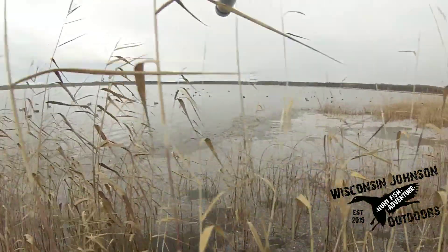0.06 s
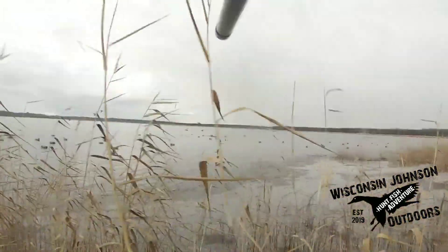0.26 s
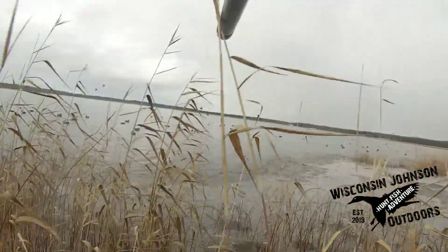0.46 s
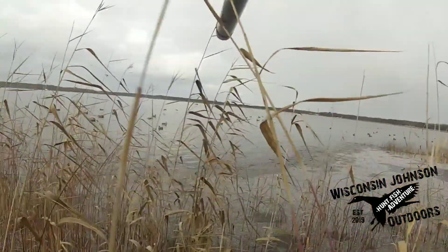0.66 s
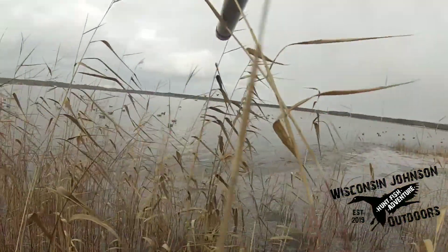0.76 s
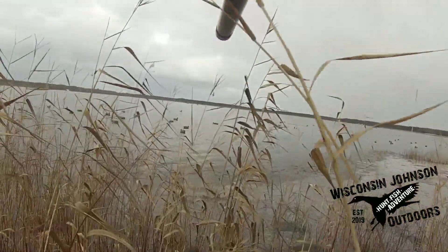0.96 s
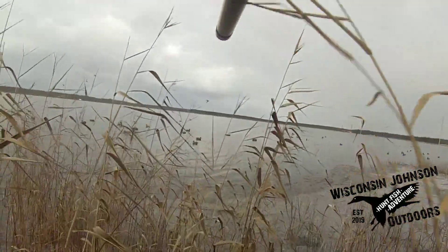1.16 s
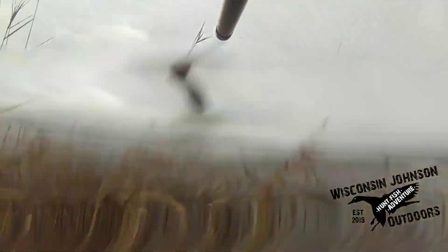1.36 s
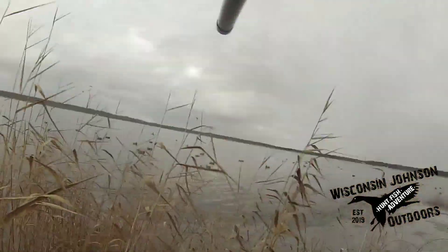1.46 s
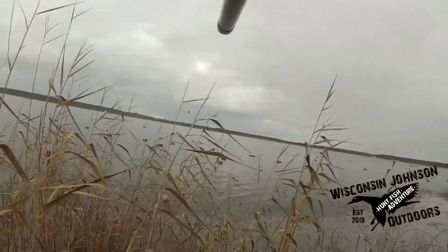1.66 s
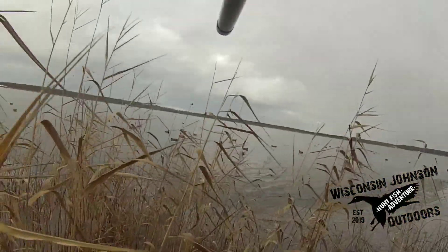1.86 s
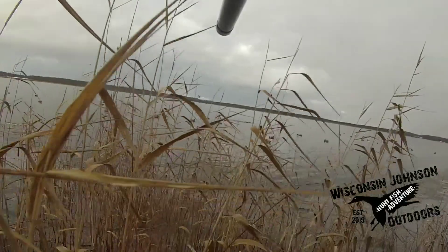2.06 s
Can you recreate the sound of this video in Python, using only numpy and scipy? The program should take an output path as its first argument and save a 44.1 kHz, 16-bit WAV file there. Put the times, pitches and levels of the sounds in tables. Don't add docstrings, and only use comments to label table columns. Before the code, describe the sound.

A metal action slams open at 0.2 s and rattles shut around 0.37-0.41, overloading the close microphone. Hard single knocks follow at 0.59 and 0.71. Bright ticks and dry stem scrapes cluster from 0.8 to 1.25 over dull grip rumble. A heavy crack at 1.4 leads into opening at 1.44 and closing around 1.62-1.66; the hollow tube ring swells briefly, then fades to faint hiss.

```python
import sys
import numpy as np
from scipy import signal
from scipy.fft import rfft, irfft, next_fast_len
from scipy.io import wavfile
from scipy.ndimage import map_coordinates

SR = 44100
rng = np.random.default_rng(int(sys.argv[2]) if len(sys.argv) > 2 else 0)


def output_pcm(signal):
    pcm = np.clip(np.atleast_2d(signal).T, -1, 1) * 32767
    wavfile.write(sys.argv[1], SR, np.round(pcm).astype(np.int16))


def elevation(decibels):
    levels = np.asarray(decibels, float)
    return 10 ** (levels / 20)


N = 92610


def unit(x):
    return x / np.sqrt(np.mean(x ** 2) + 1e-20)


def filtered(x, response):
    m = next_fast_len(N + SR // 2)
    return irfft(rfft(x, m) * response(np.fft.rfftfreq(m, 1 / SR)), m)[:N]


def coloured(points, x=None):
    f, v = np.transpose(points)
    x = rng.standard_normal(N) if x is None else x
    return unit(filtered(x, lambda hz: elevation(np.interp(np.log(hz + 1), np.log(f + 1), v, -120, -120))))


def curve(rows):
    return np.interp(np.arange(N) / SR, *np.transpose(rows))


def wobble(rate):
    knots = rng.standard_normal(int(N * rate / SR) + 4)
    return map_coordinates(knots, [np.arange(N) * rate / SR])


def grains(per_s, spike_db):
    u = rng.random((3, N))
    return (u[0] < per_s / SR) * np.sign(u[1] - .5) * elevation(-spike_db * np.log(u[2] + 0.13))


def since(s):
    return np.maximum(np.arange(N) / SR - s, 0)


def sine(hz, t, phase=0):
    return np.sin(2 * np.pi * hz * t + phase)


def strike(s, t60, attack_s, hold_s=0):
    out, first = np.zeros(N), int(s * SR) + 1
    t = np.arange(first, min(N, first + int((hold_s + 2 * t60) * SR))) / SR - s
    release = elevation(-60 * np.maximum(t - hold_s, 0) / t60)
    out[first:first + len(t)] = release * (1 - np.exp(-t / attack_s))
    return out


def stroke(rows):
    out = np.zeros(N)
    for s, length, db, fall_db in rows:
        stop_db = 60 * since(s + length) / 0.012
        out += elevation(db - fall_db * since(s) / length - stop_db) * (since(s) > 0)
    return out


def rung(s, hz, db, t60, attack_s, blur):
    out, level = np.zeros(N), strike(s, t60, attack_s)
    on = np.flatnonzero(level)
    out[on] = elevation(db) * level[on] * sine(hz, on / SR - s, blur[on])
    return out


FLOOR_DB = -72.5


def hiss():
    return elevation(FLOOR_DB) * coloured([(1000, 3.5), (4000, -3.5), (15500, -6.5)])


# [t/s, level/dB]
GRIP = [(0, -34.5), (.12, -40.5), (.4, -43.5), (.46, -50), (.58, -45.5), (.64, -40), (.7, -41.5),
        (.85, -34.5), (1, -41.5), (1.2, -48.5), (1.38, -49.5), (1.57, -36), (1.7, -46), (2.1, -51.5)]
# [f/Hz, level/dB]
HOUSING_SPECTRUM = [(20, -18.5), (90, -15.5), (250, -6.5), (550, -4), (750, -2), (1050, -10.5), (1400, -31),
                    (2000, -64.5)]


def grip():
    rumble = coloured(HOUSING_SPECTRUM) + 0.62 * coloured(HOUSING_SPECTRUM, grains(300, 2.9))
    return elevation(curve(GRIP) - 5.0 + 1.3 * wobble(30)) * rumble


# [t/s, level/dB]
STEM_CONTACT = [(0, -47), (.18, -59), (.36, -51.5), (.43, -54.5), (.57, -79), (.62, -55.5), (.74, -49),
                (.98, -48.5), (1.035, -64.5), (1.13, -47), (1.2, -70), (1.25, -60), (1.36, -73.5),
                (1.5, -54.5), (1.6, -52), (1.7, -58.5), (2.1, -86.5)]
# [f/Hz, level/dB]
STEM_SPECTRUM = [(710, -41), (1200, -2.5), (4040, -5.5), (7020, -12.5), (8260, -14.5), (14800, -25.5),
                 (16000, -38)]
SCRAPE_LUMPS_DB = 2.5


def reeds():
    scrape = coloured(STEM_SPECTRUM) + .7 * coloured(STEM_SPECTRUM, grains(1000, 6.2))
    return elevation(curve(STEM_CONTACT) + SCRAPE_LUMPS_DB * wobble(50.32)) * scrape


# [t/s, f/Hz, level/dB, t60/s]
HOUSING_KNOCKS = [(.03, 717, -24, 0.031), (.08, 603, -29, 0.048), (.2, 463.6, -10, .05),
                  (.252, 748, -20.5, 0.054), (.322, 700, -23.5, 0.046), (.6935, 583, -24, 0.058),
                  (.7075, 630, -1, 0.037), (.7115, 317, -13, 0.053), (.716, 764, -20.5, 0.043),
                  (.7947, 583, -35, .05), (.811, 582, -27.5, 0.058), (.8346, 571, -27.5, 0.079),
                  (.844, 610, -25.5, 0.028), (.9059, 537, -27.5, 0.065), (1.1274, 748, -28, 0.058),
                  (1.154, 722, -22.5, 0.05), (1.566, 734, -28, 0.073)]
KNOCK_BLUR_RAD = .8


def knocks():
    blur = KNOCK_BLUR_RAD * wobble(200)
    return sum(rung(*row, 0.00066, blur) for row in HOUSING_KNOCKS)


# [t/s, peak/dB, t60/s, level above 5 kHz/dB]
LIGHT_TICKS = [(0.0279, -23, 0.047, -4), (0.053, -36, 0.028, 2), (0.173, -37, .02, -19),
               (0.251, -35, 0.0089, -1), (.262, -34, .02, -12), (0.7013, -21, 0.023, -17),
               (0.813, -30, 0.039, -13), (.8346, -33, 0.029, -13), (.881, -34, .015, -4),
               (.896, -29, 0.026, -4), (0.9062, -25.5, 0.018, -5), (1.0562, -33, 0.013, -5),
               (1.0701, -25, 0.015, 0), (1.107, -26, 0.018, 7.5), (1.134, -37, 0.01, 3),
               (1.494, -30, 0.009, -3), (1.5427, -42, 0.017, -14), (1.565, -35, .02, -18),
               (1.616, -32, 0.013, 1), (1.7607, -45, .02, 0), (0.317, -28, 0.025, -26),
               (0.796, -30, 0.025, -23), (0.861, -25.5, 0.025, -25), (0.9383, -7, 0.026, 3.5),
               (0.9695, -14, 0.049, -0.5), (1.0174, -26, 0.012, 0), (1.0841, -21.5, 0.039, -0.5),
               (1.127, -18.5, 0.016, 4), (1.156, -11.5, 0.037, 2.5), (1.1532, -14.5, 0.039, 3.5),
               (1.2249, -11.5, 0.016, -21), (1.4894, -27, 0.01, -1), (1.5042, -19, 0.0069, 0.5),
               (1.524, -27.5, 0.021, -18), (1.797, -43, 0.031, 2.5), (1.955, -45, 0.018, 1),
               (2.0284, -50.5, 0.03, 4)]
# [f/Hz, level/dB]
TICK_SPECTRUM = [(710, -45.5), (1200, -7.5), (2180, -14.5), (3790, 0.5), (5300, -6), (6440, -4), (8170, -9),
                 (14700, -16.5), (16000, -32.5)]
TICK_HOUSING_DB = -16.5


def ticks():
    noise = coloured(TICK_SPECTRUM)
    low = filtered(noise, lambda hz: 1 / (1 + (hz / 5000) ** 8))
    high = noise - low
    out, thud = np.zeros(N), np.zeros(N)
    for s, db, t60, high_db in LIGHT_TICKS:
        out += elevation(db - 6.5) * strike(s, t60, 0.000081) * (low + elevation(high_db) * high)
        thud += elevation(db + TICK_HOUSING_DB) * strike(s, 0.067, 0.0085)
    return out + thud * coloured(HOUSING_SPECTRUM)


# [t/s, f/Hz, level/dB, t60/s]
PART_NOTES = [(.2805, 3050, -32, .024), (.3676, 2120, -15, .021), (.3752, 2920, -19, .021),
              (.3858, 1950, -13, .021), (.3983, 2820, -5, .024), (.5886, 3320, -9, .024),
              (.7066, 3450, -9, .024), (.9395, 3500, -16, .03), (.9545, 3850, -36, .035),
              (.9725, 6250, -26, .028), (1.085, 3900, -30, .045), (1.1545, 3600, -19, .04),
              (1.1565, 6500, -30, .085), (1.172, 5650, -49, .13), (1.2255, 3900, -24, .028),
              (1.2275, 2650, -49, .22), (1.2272, 3270, -45, .12), (1.6555, 2380, -9, .024),
              (1.666, 13050, -48, .11)]
PART_BLUR_RAD = .55


def small_parts():
    blur = PART_BLUR_RAD * wobble(150)
    return sum(rung(*row, 0.00027, blur) for row in PART_NOTES)


# [t/s, length/s, level/dB, fall/dB]
BRIGHT_DRAGS = [
    (.2244, 0.023, -21, 24.5),
    (1.441, 0.022, -19, 8.5),
    (1.465, 0.019, -25.5, 16),
    (.596, 0.14, -46, 15.5),
    (.715, 0.076, -32, 30),
    (1.054, 0.0925, -43.5, -5),
]
DRAG_LUMPS_DB, DRAG_SPIKE_DB = 3, 4


def drags():
    crackle = coloured(TICK_SPECTRUM, grains(3000, DRAG_SPIKE_DB))
    return stroke(BRIGHT_DRAGS) * elevation(DRAG_LUMPS_DB * wobble(100)) * crackle


# [t/s, level/dB]
LOOSENESS = [(.2, -93.5), (.26, -50.5), (.36, -49), (.43, -44.5), (.5, -67), (.585, -60.5), (.6, -92),
             (1.45, -93.5), (1.51, -48), (1.62, -45), (1.7, -53.5), (1.85, -63), (2.1, -76.5)]
# [f/Hz, level/dB]
BUZZ_SPECTRUM = [(1400, -14.5), (1950, 1.5), (2250, 3), (2600, -9.5), (3100, 1.5), (3900, -12.5),
                 (5400, -16), (8000, -30)]


def buzz():
    chatter = coloured(BUZZ_SPECTRUM) + 0.48 * coloured(BUZZ_SPECTRUM, grains(560, 3))
    return elevation(curve(LOOSENESS) + 3 * wobble(70)) * chatter


# [t/s, level/dB]
SPRING_HUMS = [
    (0.242, -47.5),
    (.44, -57),
    (1.479, -51),
]
SPRING_S, SPRING_FROM_HZ, SPRING_TO_HZ = .13, 85, 102


def springs():
    out = np.zeros(N)
    for s, db in SPRING_HUMS:
        u = np.clip(since(s) / SPRING_S, 0, 1)
        hz = SPRING_FROM_HZ + (SPRING_TO_HZ - SPRING_FROM_HZ) * u ** .5
        out += elevation(db) * np.abs(np.sin(np.pi * u)) ** .5 * np.sin(2 * np.pi * np.cumsum(hz) / SR)
    return out


REGRIP_S, REGRIP_T60_S, REGRIP_DB, REGRIP_HZ = 1.86, 0.29, -51.5, 586


def regrip():
    level = elevation(REGRIP_DB + 1.62 * wobble(20)) * strike(REGRIP_S, 1.6, 0.034)
    return level * sine(REGRIP_HZ, since(REGRIP_S), 0.29 * wobble(80))


# [t/s, level/dB, unsteadiness/rad, sway share/0-1, main mode extra/dB]
TUBE_RINGS = [
    (.25, -23.5, 0.77, 0.02, -4.7),
    (.41, -25, 0.24, 0.42, -2),
    (1.5, -27, 1.15, 0.16, 2),
    (1.665, -29.5, 0.38, 0.93, 1.5),
]
TUBE_DAMPED_S = [
    .37,
    .588,
    1.625,
    3,
]
# [f/Hz, level/dB, t60/s]
TUBE_MODES = [(367, -13.5, 0.56), (604, -16.5, 2.8), (702, 1, 0.95), (802, 0, 0.74), (992, -5, 0.96),
              (1740, -28, 1), (1930, -14.5, 0.42), (2350, -24.5, 0.58)]
MAIN_MODE = 2
SWAY_HZ, SWAY_DB, SWAY_T60_S = 35.3, -1, 1.6
GAIN_BACK_S = 0.063
TUBE_FLUTTER_DB, TUBE_BLUR_PER_S, BLUR_GROWS = 2, 120, 1.5


def tube():
    choke_db = 60 * since(REGRIP_S) / REGRIP_T60_S
    out = np.zeros(N)
    for (s, db, unsteady, sways, main_db), end in zip(TUBE_RINGS, TUBE_DAMPED_S):
        t = since(s)
        ring = np.zeros(N)
        for k, (hz, mode_db, t60) in enumerate(TUBE_MODES):
            level_db = mode_db - 60 * t / t60 + TUBE_FLUTTER_DB * wobble(11.88)
            if k == MAIN_MODE:
                level_db = level_db + main_db - choke_db
            blur = unsteady * (hz / 700) ** BLUR_GROWS * wobble(TUBE_BLUR_PER_S)
            ring += elevation(level_db) * sine(hz, t, blur)
        sway = sways * elevation(SWAY_DB - 60 * t / SWAY_T60_S) * sine(SWAY_HZ, t)
        gain = (1 - np.exp(-t / GAIN_BACK_S)) ** 2
        out += elevation(db - 60 * since(end) / 0.023) * gain * (ring + sway)
    return out


# [t/s, length/s, level/dB, fall/dB]
ACTION_SLIDES = [
    (0.204, 0.061, -11, 26),
    (0.366, 0.037, -19, 12.5),
    (1.442, 0.062, -15, 17.5),
    (1.621, 0.046, -19, 5.5),
]
# [f/Hz, level/dB]
CLATTER_SPECTRUM = [(60, -29.5), (120, -16), (736, 4), (1300, -7.5), (2150, -2.5), (3300, -4.5),
                    (5000, -23.5), (10700, -31.5), (16000, -43)]
SLIDE_GRAINS_PER_S, SLIDE_SPIKE_DB, SLIDE_LUMPS_DB = 3500, 4.5, 2


def slides():
    chatter = coloured(CLATTER_SPECTRUM, grains(SLIDE_GRAINS_PER_S, SLIDE_SPIKE_DB))
    return stroke(ACTION_SLIDES) * elevation(SLIDE_LUMPS_DB * wobble(180)) * chatter


# [f/Hz, width/Hz, level/dB]
STEEL_MODES = [(2000, 730, -9.5), (2940, 970, -4), (6060, 270, -14.5)]
STEEL_DB = -6


def steel(f):
    modes = sum(elevation(db) * 4j * f * w / (c * c - f * f + 1j * f * w) for c, w, db in STEEL_MODES)
    return 1 + elevation(STEEL_DB) * modes


# [t/s, crack peak/dB, housing re crack/dB, housing f/Hz, hold at full level/s]
SLAMS = [(0.199, 2.5, -10.5, 903, 0.0054), (0.2263, -3.5, -18.5, 830, 0.00087),
         (0.367, -15.5, 8, 750, 0.0022), (0.375, -17.5, 9, 692, 0.0012), (0.384, -13.5, 7.5, 1074, 0.0025),
         (0.389, -12.5, -18, 756, 0.0017), (0.3961, -2.5, -4.5, 1060, 0.0041),
         (0.4054, -13.5, 12, 836, 0.0018), (.5878, 7.5, -2, 432, 0.002), (0.706, 1.5, -8.5, 557, 0.004),
         (1.3965, 4, 2, 416, 0.0031), (1.4399, -2, -11, 908, 0.0029), (1.4651, -8.5, -1, 742, 0.0019),
         (1.6244, -17, 11, 753, 0.0014), (1.6315, -18, 11, 701, 0.0022), (1.6409, -12, -0.5, 1110, 0.0017),
         (1.6447, -16.5, 0.5, 758, 0.0031), (1.6536, 0.5, -1, 956, 0.0029),
         (1.6609, -10.5, 10.5, 801, 0.0019)]
# [f/Hz, level/dB]
CRACK_SPECTRUM = [(710, -28.5), (1200, 2), (1900, -5.5), (3010, -5.5), (6580, -4), (8080, -7.5),
                  (13300, -16), (16000, -36)]
RELEASE_T60_S, LEAD_S, LEAD_DB = .012, 0.0035, -20.5
AFTER_DB, AFTER_T60_S = -37.5, 0.12
HOUSING_LINGERS_S, HOUSING_TAIL, HOUSING_T60_S = 0.0013, 0.24, 0.057
BODY_HZ, BODY_DB, BODY_T60_S = 203.1, -19.5, 0.037
THUMP_S, THUMP_DB = 0.0019, -7.5


def slams():
    burst, low = np.zeros(N), np.zeros(N)
    clatter = coloured(CLATTER_SPECTRUM)
    for s, db, rel_db, hz, hold_s in SLAMS:
        crack = strike(s, RELEASE_T60_S, 0.00073, hold_s) + 0.051 * strike(s, 0.093, 0.00067)
        lead = elevation(LEAD_DB) * strike(s - LEAD_S, 0.023, 0.0051)
        after = elevation(AFTER_DB) * strike(s, AFTER_T60_S, 0.0045)
        burst += elevation(db - 10.5) * (crack + lead + after)

        t = since(s)
        note = sine(hz, t) + 0.59 * sine(1.4 * hz, t) + 0.63 * clatter
        envelope = strike(s, 0.0078, 0.0009, hold_s + HOUSING_LINGERS_S)
        envelope += HOUSING_TAIL * strike(s, HOUSING_T60_S, 0.0056)
        low += elevation(db + rel_db - 5.5) * note * envelope
        body = sine(BODY_HZ, t, wobble(60)) * strike(s, BODY_T60_S, 0.00013)
        low += elevation(db + BODY_DB) * 600 / hz * body
        u = t / THUMP_S
        low += elevation(db + THUMP_DB) * u * (1 - u / 2) * np.exp(-u)
    return filtered(burst * coloured(CRACK_SPECTRUM), steel) + low


def scene():
    background = hiss() + grip() + reeds() + knocks() + ticks() + small_parts() + drags()
    action = buzz() + springs() + regrip() + tube() + slides() + slams()
    return (background + action)[None]


def low_pass(x):
    return signal.sosfilt(signal.butter(12, 16530, fs=SR, output="sos"), x)


NOTCH_HZ, NOTCH_WIDTH_HZ, NOTCH_SHARE = 8250, 450, .7
CLIP_TOP, CLIP_HARD = 1.01, 8
TOP_HZ = 15600


def record(dry):
    heard = filtered(dry[0], lambda hz: 1 - NOTCH_SHARE / (1 + ((hz - NOTCH_HZ) / NOTCH_WIDTH_HZ) ** 2))
    clipped = heard / (1 + np.abs(heard / CLIP_TOP) ** CLIP_HARD) ** (1 / CLIP_HARD)
    limited = filtered(clipped, lambda hz: 1 / (1 + (hz / TOP_HZ) ** 60))
    return low_pass(limited[None])


dry = scene()
out = record(dry)
output_pcm(out)
```